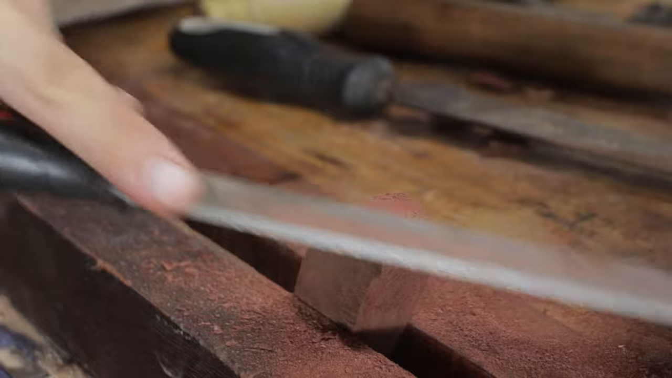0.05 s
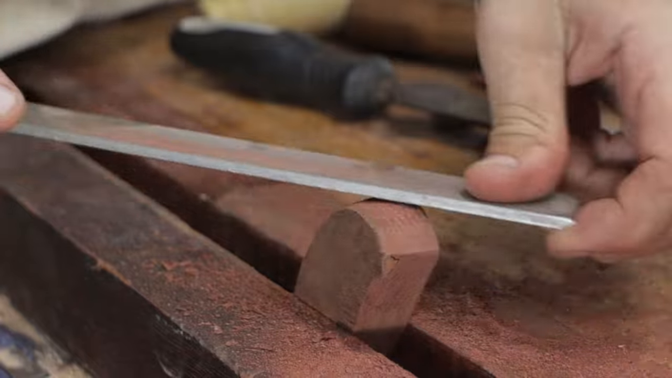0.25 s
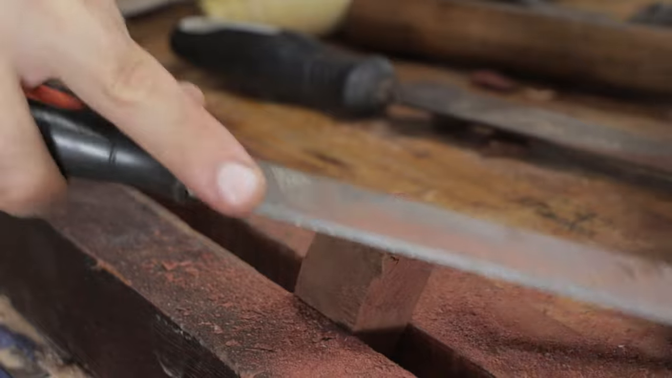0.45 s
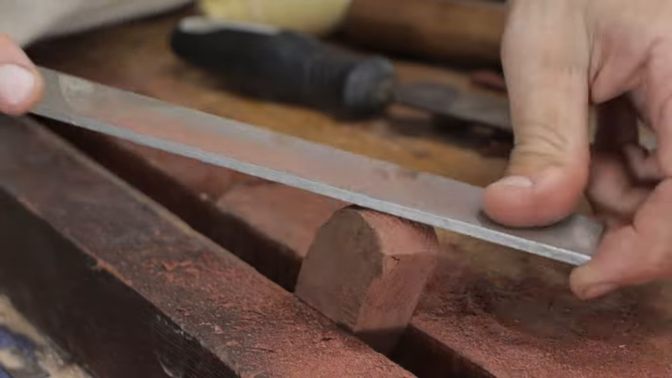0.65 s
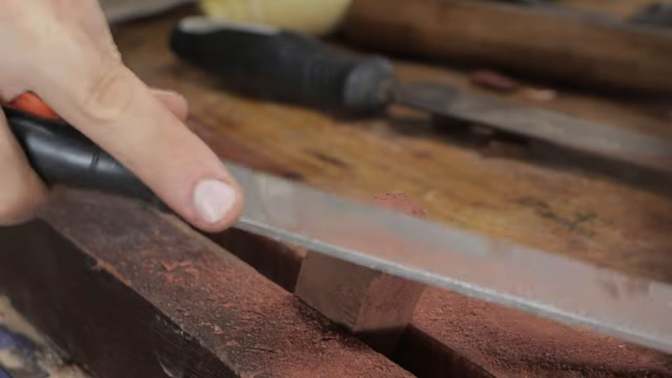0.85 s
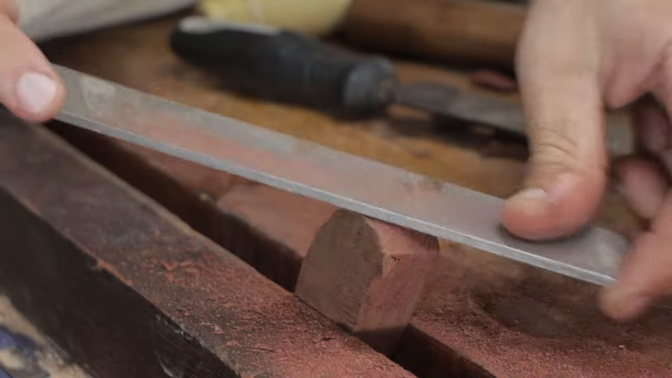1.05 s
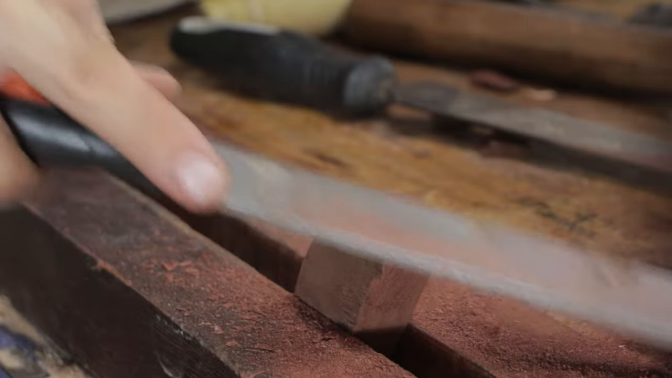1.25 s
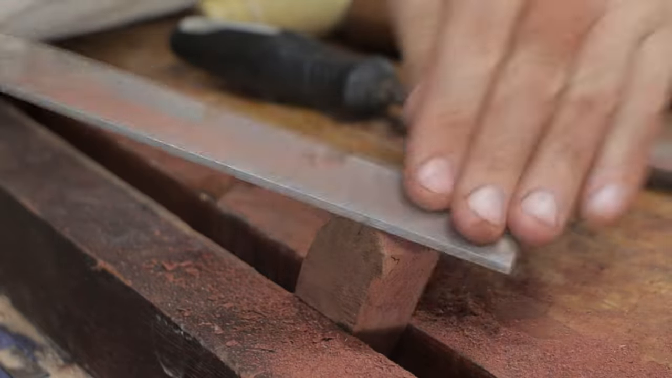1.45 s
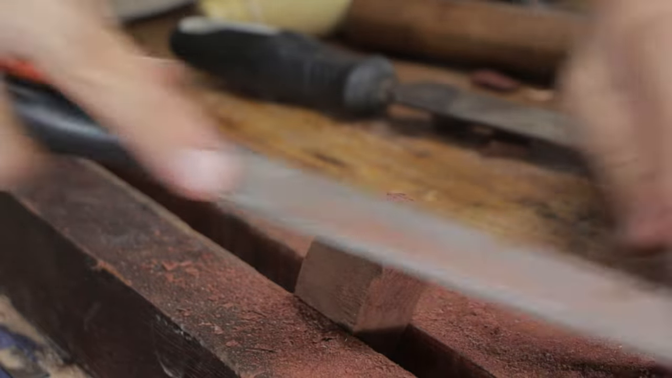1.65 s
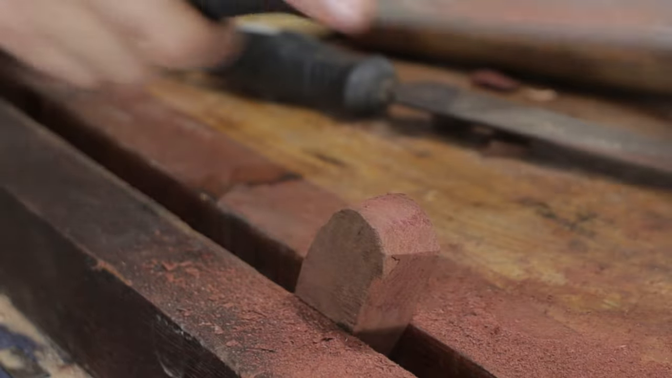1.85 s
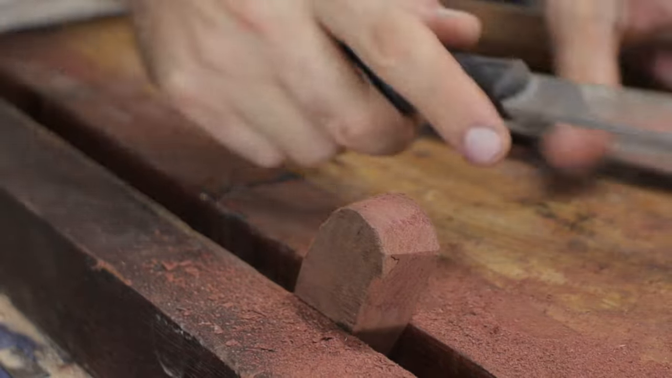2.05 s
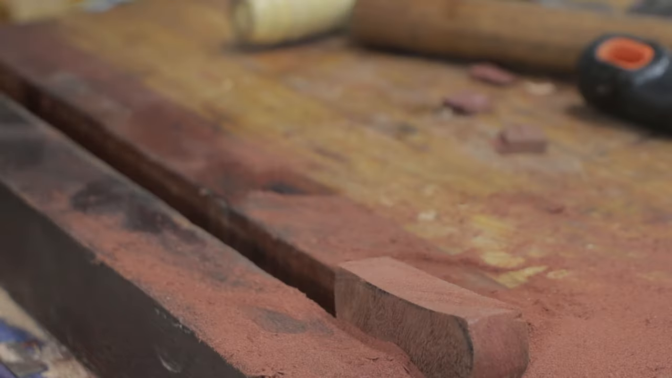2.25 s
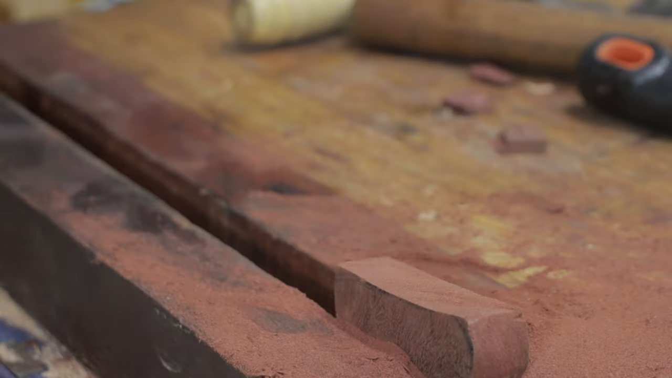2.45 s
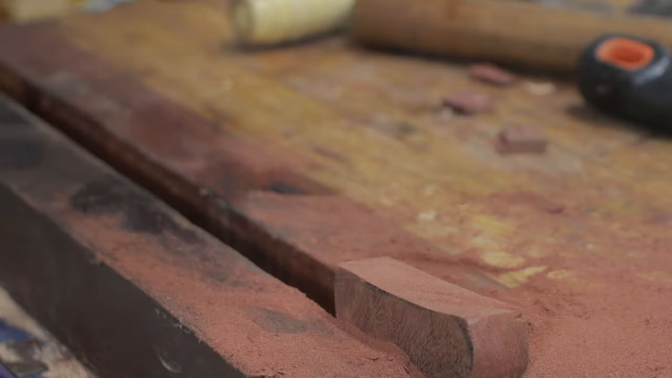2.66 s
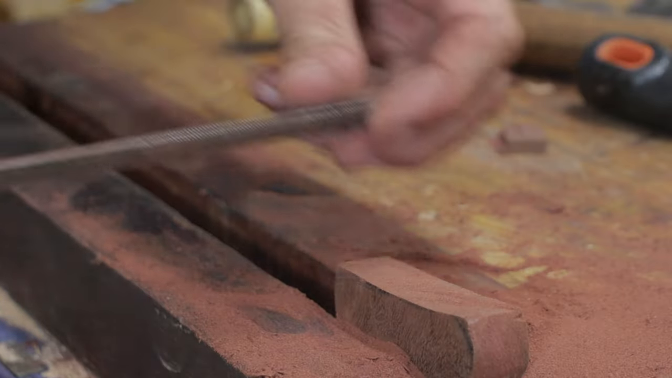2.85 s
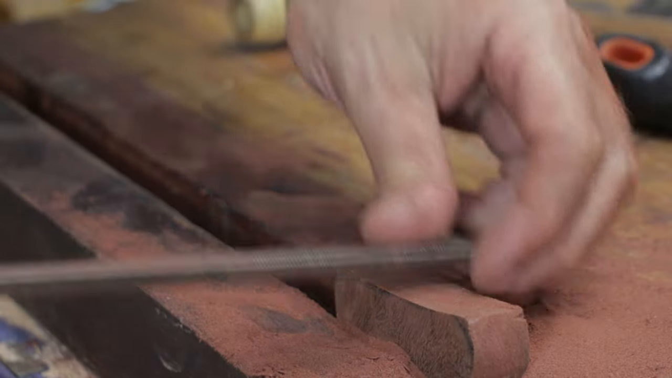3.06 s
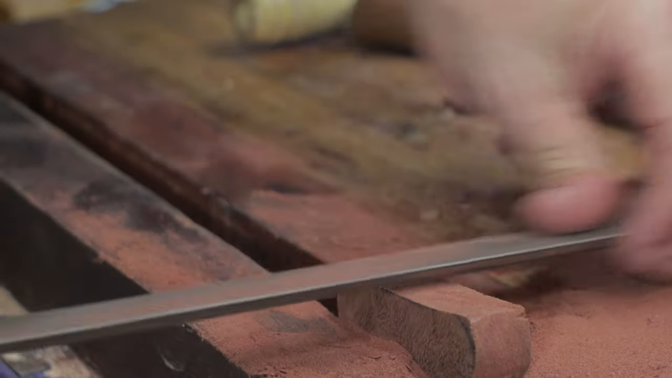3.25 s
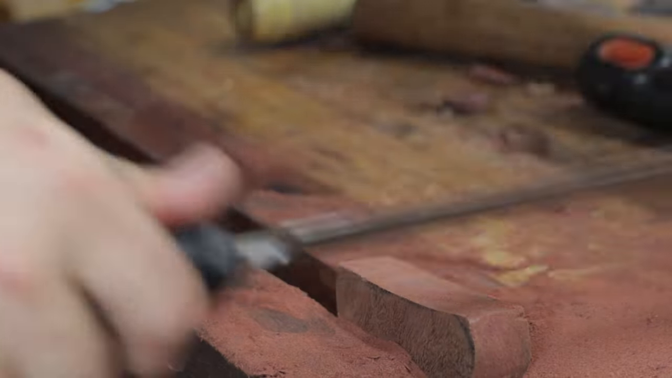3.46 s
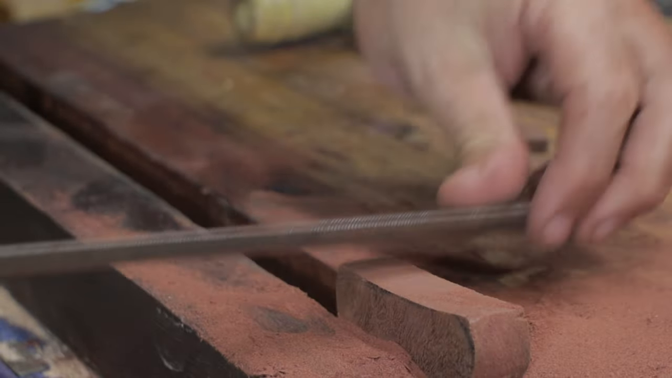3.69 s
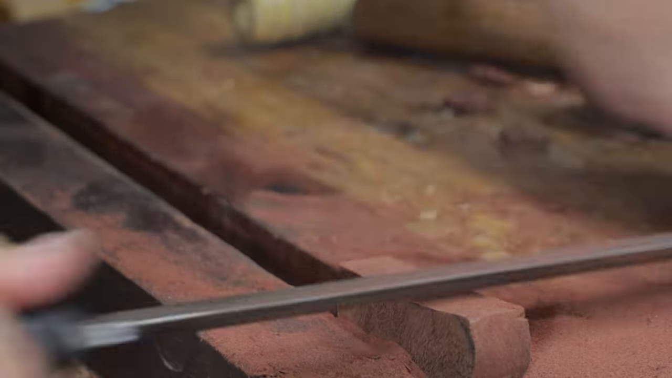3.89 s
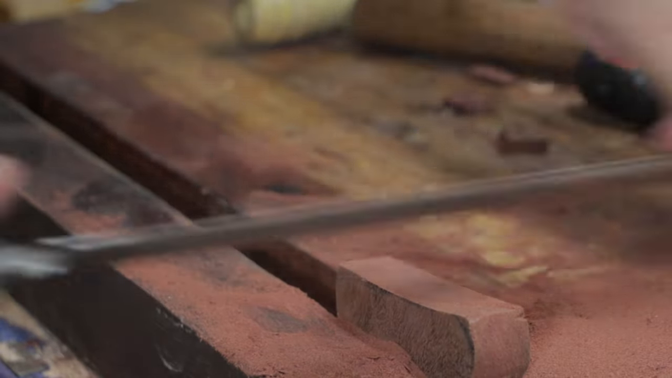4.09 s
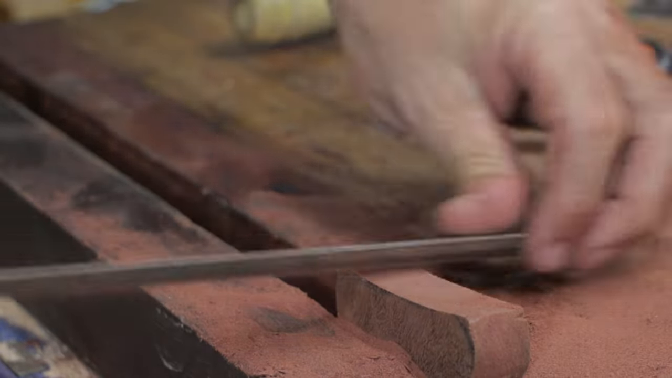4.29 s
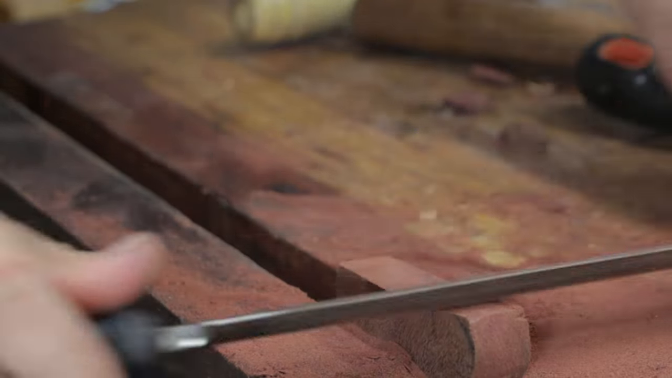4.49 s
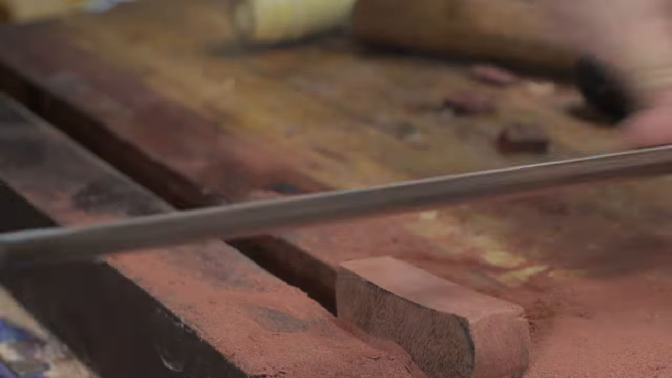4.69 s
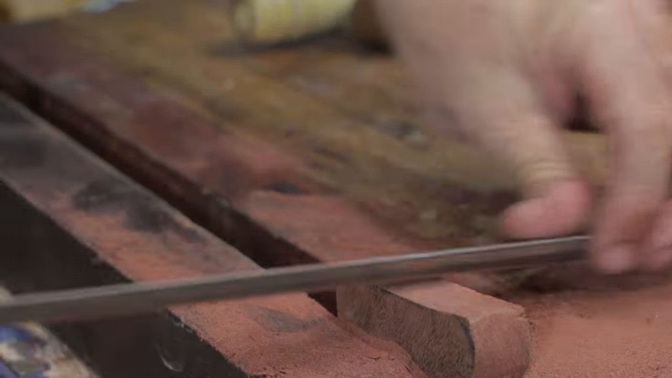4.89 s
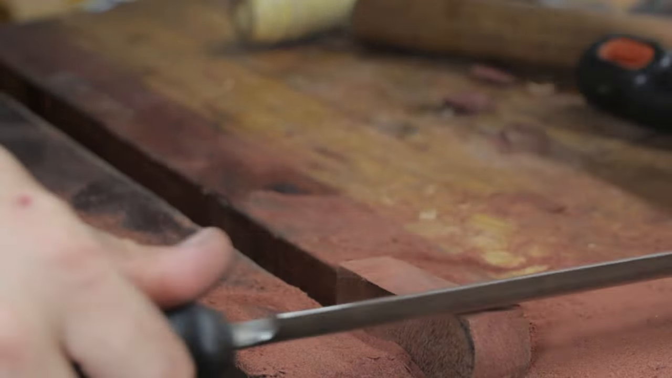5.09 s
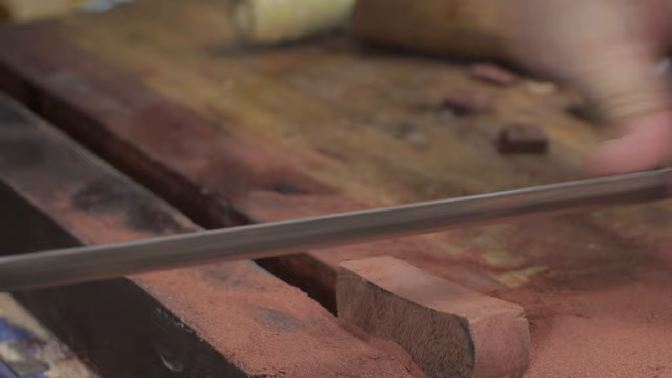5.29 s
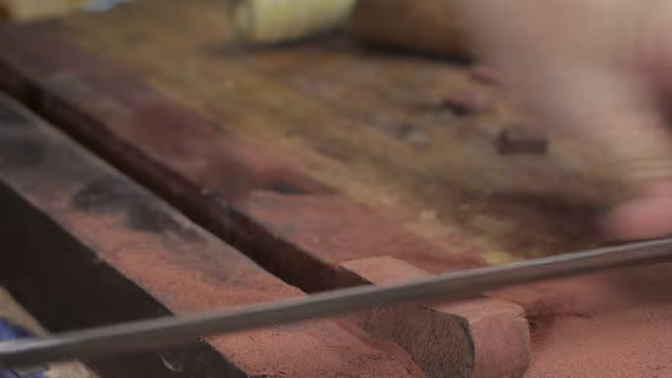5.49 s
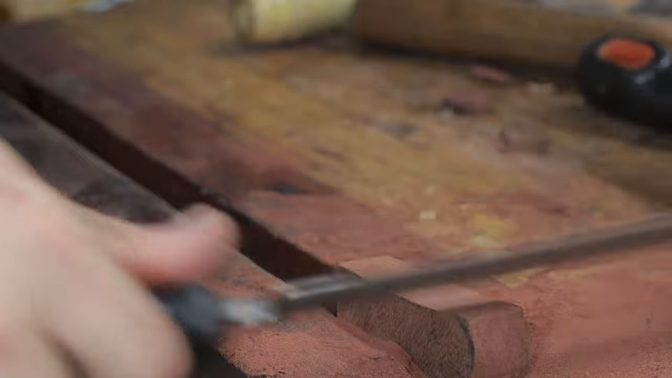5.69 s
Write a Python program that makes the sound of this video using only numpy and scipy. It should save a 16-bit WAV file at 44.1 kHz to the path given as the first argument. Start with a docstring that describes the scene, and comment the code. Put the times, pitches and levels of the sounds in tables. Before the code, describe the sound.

A steel file rasps a small wooden block in short, buzzing strokes, pauses for handling clicks, then resumes with coarser, ringing scrapes.

```python
"""Filing a wooden block at a bench

A steel hand file rasps a small wooden block held in a bench: first across its rounded end, then, after some
handling, along its flat side. Teeth and landing knocks drive the damped modes of bench, vice, block and blade;
torn fibres hiss as filtered noise, and short wavering tones glide. Touches tick and thud, hands and cloth rustle.
Outside, an engine of summed harmonics idles and pulls away; hum and far rumble are filtered noise.
"""
import sys
import numpy as np
from scipy import signal
from scipy.fft import rfft, irfft, next_fast_len
from scipy.io import wavfile
from scipy.ndimage import uniform_filter1d, map_coordinates

SR = 44100
rng = np.random.default_rng(int(sys.argv[2]) if len(sys.argv) > 2 else 0)


def dump(signal):
    """Clip the signal to [-1, 1] and save it as 16-bit WAV at the path in sys.argv[1]."""
    limited = np.clip(np.atleast_2d(signal).T, -1, 1)
    pcm = np.round(limited * 32767).astype(np.int16)
    wavfile.write(sys.argv[1], SR, pcm)


N = 252957

# The file lands or bounces on the wood; the first seven on the rounded end, the rest on the flat side:
# t/s, bench level/dB, then vice, block and blade level/dB relative to the bench
FILE_LANDINGS = [(0.324, -39, 2.5, -3, -16.5), (0.373, -51.5, -14, 6.5, -1), (0.705, -43, 1, 3, -9),
                 (0.724, -33, 2, 0, -18), (0.748, -44.5, -12, -2, -17), (1.128, -22.5, -2.5, -11.5, -25),
                 (1.576, -24, 6.5, -3.5, -27), (3.192, -32.5, 14, 4.5, -1.5), (3.28, -28.5, 4, -4.5, -23),
                 (3.845, -32.5, 7, -10, -2), (3.855, -22.5, 0.5, -36, -14), (4.396, -22.5, 1, -43, -19),
                 (4.966, -24, 0, -37, -24), (5.527, -26, 4, -31, -51)]


def amp(db):
    """Level law: the amplitude gain of a level in dB."""
    return 10 ** (np.asarray(db) / 20)


def unit(x):
    """Normalization: x scaled to rms 1."""
    return x / np.sqrt(np.mean(x ** 2) + 1e-20)


def along(points, hz):
    """Logarithmic interpolation: (f/Hz, value) points joined on a log-frequency axis."""
    f, v = np.transpose(points)
    return np.interp(np.log(hz + 1), np.log(f + 1), v)


def curves(rows, outside=-120):
    """Linear interpolation in time: each column after t/s sampled, with one fixed value outside the times."""
    s, *cols = np.transpose(rows)
    t = np.arange(N) / SR
    return np.array([np.interp(t, s, c, outside, outside) for c in cols])


def wobble(rate):
    """Band-limited randomness: a smooth curve through random knots, rate knots a second."""
    knots = rng.standard_normal(int(N * rate / SR) + 4)
    return map_coordinates(knots, [np.arange(N) * rate / SR])


def filtered(x, response):
    """Linear filtering: x times a complex response, scaled so that white noise keeps its level."""
    m = next_fast_len(N + SR // 2)
    gain = response(np.fft.rfftfreq(m, 1 / SR))
    gain = gain / np.sqrt(np.mean(abs(gain) ** 2))
    return irfft(rfft(x, m) * gain, m)[..., :N]


def resonances(modes):
    """Modal superposition: damped modes (f/Hz, width/Hz, level/dB) added with alternating sign."""
    def response(f):
        total = 0
        for k, (centre, width, db) in enumerate(modes):
            damping = 1j * f * width
            total = total + (-1) ** k * amp(db) * damping / (centre * centre - f * f + damping)
        return total
    return response


def patchy(depth_db, size=(3, 6)):
    """Spectro-temporal modulation: noise of rms 1 whose strength drifts in patches of pitch and time."""
    z = signal.stft(rng.standard_normal(N + SR), nperseg=512)[2]
    field = uniform_filter1d(rng.standard_normal(z.shape), size=size[0], axis=0)  # along pitch
    field = uniform_filter1d(field, size=size[1], axis=1)  # along time
    return unit(signal.istft(z * amp(depth_db * unit(field)), nperseg=512)[1][:N])


def end_filing():
    """Forced vibration of the upright block: the file crosses its rounded end."""
    # Pushes: touch-down t/s, build-up/s, hold/s, swell while held/(dB/s),
    # bench, vice, block and blade level/dB, teeth passing f/Hz
    end_pushes = [(-0.2, .13, 0.074, 5, -38.5, -39.5, -34.5, -42, 1362),
                  (0.324, 0.11, 0.081, 33, -41, -37.5, -33, -39.5, 1398),
                  (0.705, .14, 0.063, 42.5, -41, -36.5, -33, -37, 1427),
                  (1.128, 0.091, .06, 17.5, -38.5, -39, -31, -37, 1449),
                  (1.575, 0.1, 0.054, 38, -35.5, -34, -26.5, -32.5, 1533)]
    # How bench, vice, block and blade follow a push: rise/(dB/s), sag while held/(dB/s), fall/(dB/s),
    # lag/s, settling level after a landing/dB, its t60/s
    end_followers = [(100, 15, 260, 0.0081, -10, 0.19), (177, -4, 240, 0.0069, -12, 0.12),
                     (352, 2, 341, 0.00087, -6.5, 0.038), (330, 14, 331, 0.0017, 2.5, 0.035)]
    # What rings with the block upright: f/Hz, width/Hz, level/dB
    end_resonances = [(219, 17.5, 6), (284, 96, -7.5), (398, 108, -7.5), (592, 113, -8), (708, 157, -11),
                      (915, 190, -14), (1010, 18, -5.5), (1273, 108, -1), (1490, 111, 0), (1620, 79, 0),
                      (1940, 314, -8.5), (3460, 260, -18), (2800, 650, -28), (3840, 187, -8),
                      (4200, 740, -16), (5560, 220, -15), (6660, 290, -17.5), (8100, 530, -33.5)]
    return filing(end_pushes, end_followers, end_resonances, FILE_LANDINGS[:7], dust_db=-4,
                  slowing=.12, teeth_part=2, teeth_db=-17)  # the block buzzes


def side_filing():
    """Forced vibration of the block lying flat: a coarser cut excites it at a lower tooth rate."""
    # Pushes: touch-down t/s, build-up/s, hold/s, swell while held/(dB/s),
    # bench, vice, block and blade level/dB, teeth passing f/Hz
    side_pushes = [(3.192, 0.13, 0.1, 27, -42.5, -32, -33, -33.5, 420),
                   (3.848, 0.075, 0.13, -19, -37.5, -30.5, -33, -30.5, 649),
                   (4.398, 0.059, 0.14, 1, -41, -31, -35, -31.5, 641),
                   (4.967, 0.079, .12, -6.5, -39, -29, -34.5, -30.5, 668),
                   (5.526, 0.081, 0.11, -22, -39.5, -32, -34, -29.5, 670)]
    # How bench, vice, block and blade follow: rise/(dB/s), sag/(dB/s), fall/(dB/s), lag/s, settling level/dB, t60/s
    side_followers = [(49.4, 24, 67, -0.02, 1.5, 0.21), (30, 3.3, 246, 0.012, -9, 0.068),
                      (210, 5, 346, 0.0011, -19, 0.21), (270, 12.3, 320, -0.0021, -13.5, 0.3)]
    # What rings with the block lying flat: f/Hz, width/Hz, level/dB
    side_resonances = [(227, 30, -1.5), (268.5, 28.3, 0), (374.2, 33.6, 4), (550, 264, -6.5),
                       (605.4, 97, -1), (726, 85, -4), (807, 41, -5.5), (857, 77, -10.5), (1001.2, 23, -7),
                       (1263, 105, -8), (1728, 110, -9.5), (2030, 160, -18), (2120, 28, -3.5),
                       (2415, 430, -18.5), (2755, 118, -6), (3000, 150, -4), (3098, 106, 2),
                       (3700, 280, -6.5), (4090, 340, -4.5), (4500, 590, -11.5), (6130, 2600, -20.5),
                       (6740, 580, -12.5), (9030, 480, -29.5)]
    return filing(side_pushes, side_followers, side_resonances, FILE_LANDINGS[7:], dust_db=-9,
                  slowing=.5, teeth_part=1, teeth_db=-16)  # the vice buzzes


def sliding_back():
    """Friction noise without a tooth tone: the blade slides lightly back over its modes."""
    # Slides: touch-down t/s, build-up/s, hold/s, swell while held/(dB/s),
    # bench, vice, block and blade level/dB, teeth passing f/Hz (not sounded here)
    slide_pushes = [(3.505, 0.084, .26, -34, -52.5, -43.5, -46.5, -53, 915),
                    (4.13, 0.031, 0.34, -34, -52, -47, -63, -65, 912)]
    # How bench, vice, block and blade follow: rise/(dB/s), sag/(dB/s), fall/(dB/s), lag/s, settling level/dB, t60/s
    slide_followers = [(60, -21, 250, .001, 0, .1), (60, -17, 150, .001, 0, .1),
                       (200, 51, 300, .001, 0, .1), (29.6, -2, 300, 0.0014, 0, .1)]
    # What rings under the lightly held blade: f/Hz, width/Hz, level/dB
    slide_resonances = [(243, 34, -5), (372, 33, 9), (915, 140, -10.5), (1250, 83, -11.5), (1620, 160, -12),
                        (2110, 200, -11), (3180, 79, -10), (4760, 230, -33), (6560, 520, -16),
                        (8600, 340, -19.5), (10700, 1500, -34), (13000, 530, -28)]
    return filing(slide_pushes, slide_followers, slide_resonances, [], dust_db=-12.0)


def filing(strokes, parts, modes, landings, dust_db, slowing=0, teeth_part=None, teeth_db=0):
    """Source-filter principle: teeth catching fibres and landing knocks drive the modes of four parts."""
    # Edges of the bands that belong to bench, vice, block and blade: f/Hz
    band_edges = [0, 320, 1000, 2500, 20000]
    # Hiss of torn fibres: f/Hz, relative level per Hz/dB
    dust_spectrum = [(2350, 2), (4000, -13), (4780, 4.5), (6110, 1), (6730, -5.5), (8130, -8), (13600, -14),
                     (15700, -69)]
    effort, teeth_hz, pace = pushes(strokes, parts, landings, slowing)

    # the faster the push, the higher the buzz
    turn = 2 * np.pi * np.cumsum(abs(teeth_hz) * (1 + 0.04016 * wobble(70))) / SR
    uneven_db = 2.5 * wobble(40)
    buzz = pace * amp(teeth_db + uneven_db) * (np.sin(turn) + 0.33 * np.sin(2 * turn))
    chatter = unit(amp(0.33 * wobble(60) + 0.64 * wobble(500)))  # the teeth bite unevenly

    bounce = amp(-60 * np.arange(SR // 20) / SR / 0.0067)  # the blade rattles briefly as it settles
    blow = 6 * (np.arange(len(bounce)) == 0)  # the first contact is one firm push
    out = np.zeros(N)
    for part, (lo, hi) in enumerate(zip(band_edges, band_edges[1:])):
        # the contact travels along the blade, feeding now one mode, now another
        drive = chatter * patchy(depth_db=3, size=(7, 10))
        if part == teeth_part:
            drive = drive + buzz
        force = effort[part] * drive
        for s, db, *rel_db in landings:
            at = round(s * SR)
            knock = bounce * (blow + rng.standard_normal(len(bounce)))
            force[at:at + len(bounce)] += amp(db + [0, *rel_db][part] - 2.0) * knock
        part_modes = [mode for mode in modes if lo <= mode[0] < hi]
        out += filtered(force, resonances(part_modes))

    dust = filtered(patchy(depth_db=1.6), lambda hz: amp(along(dust_spectrum, hz)))
    return out + amp(dust_db) * effort[-1] * chatter * dust


def pushes(strokes, parts, landings, slowing):
    """Exponential envelopes: force builds after touch-down, holds and dies; each landing settles."""
    rounding_s = 0.041  # the hand eases from one phase into the next
    arc_s = .13  # the teeth pass fastest in mid-push and slowest this far from it
    t = np.arange(N) / SR
    effort, teeth_hz, pace = np.zeros((len(parts), N)), np.zeros(N), np.zeros(N)
    for s, build_s, hold_s, swell, *levels_db, hz in strokes:
        for k, (rise, sag, fall, lag_s, *_) in enumerate(parts):
            u = t - s - build_s - lag_s  # time since the hold began
            shape_db = rise * np.minimum(u, 0)
            shape_db += (swell - sag) * np.clip(u, 0, hold_s)
            shape_db -= fall * np.maximum(u - hold_s, 0)
            shape = amp(uniform_filter1d(shape_db, size=int(rounding_s * SR)))
            effort[k] += (t >= s) * amp(levels_db[k]) * shape
        from_middle = (t - s - build_s - hold_s / 2) / arc_s
        speed = np.cos(np.pi / 2 * np.clip(from_middle, -1, 1))
        pace = np.where(t >= s, speed, pace)
        teeth_hz = np.where(t >= s, hz * (1 - slowing * (1 - speed)), teeth_hz)
    for s, db, *rel_db in landings:
        for k, (*_, settle_db, t60) in enumerate(parts):
            effort[k] += (t >= s) * amp(db + [0, *rel_db][k] + settle_db - 60 * abs(t - s) / t60)
    return effort, teeth_hz, pace


def singing():
    """Frequency modulation: a wavering tone swells, glides and dies: bench ring, blade whistle, tooth buzz or bounce."""
    # Tones: loudest t/s, f/Hz, glide/(Hz/s), waver as a share of f, level/dB, rise/(dB/s), fall/(dB/s)
    sung_tones = [(0.545, 1293, -300, 0.021, -38, 304, 300), (0.547, 219, -19, 0.0085, -31.5, 900, 202),
                  (0.707, 1291, -100, .02, -36, 6000, 450), (0.724, 1291, -100, .02, -36, 5000, 700),
                  (0.746, 1291, -100, .02, -39, 5000, 700), (1.141, 219, -20, .01, -36.5, 2000, 400),
                  (1.32, 219, -20, 0.0093, -40.5, 90, 248), (1.7, 219, -19.5, .01, -31, 300, 300),
                  (3.405, 713, 1399.5, .015, -29, 332, 258), (3.553, 915, 100, 0.054, -36.5, 3000, 107),
                  (4.635, 369, -50, 0.016, -28.5, 402, 400), (5.21, 391.3, -50.5, 0.016, -30, 400, 400)]
    out, t = np.zeros(N), np.arange(N) / SR
    for s, hz, glide, waver, db, rise, fall in sung_tones:
        gliding_hz = hz + glide * np.clip(t - s, -.1, .1)
        turn = 2 * np.pi * np.cumsum(gliding_hz * (1 + waver * wobble(220))) / SR
        swell_db = np.where(t < s, rise, -fall) * (t - s)
        flutter_db = 3 * wobble(110)
        out += np.sqrt(2) * amp(db + swell_db + flutter_db) * np.sin(turn)
    return out


def touches():
    """Impact excitation: tools and hands tick around a pitch of their own and thud in the bench."""
    # Touches: t/s, tick peak level/dB, tick f/Hz, thud level relative to the tick/dB
    touch_events = [(1.9362, -42.5, 1520, -10), (1.9628, -47, 2200, -19), (2.029, -45, 1620, 2),
                    (2.036, -40, 8600, -23), (2.0405, -36, 9900, -31), (2.06, -42, 4760, -11),
                    (2.0768, -39, 1640, 1.5), (2.0825, -26.5, 4030, -20), (2.095, -37, 1780, 0.5),
                    (2.1276, -42, 1760, -5), (2.2082, -40, 1940, 3), (2.2119, -37, 3570, 5),
                    (2.4826, -36.5, 4020, -10), (2.491, -32, 1510, 1.5), (2.8135, -55, 1620, 20.5),
                    (2.8653, -46, 2300, -24), (2.9948, -34, 7700, -24), (3.019, -58, 1590, 11),
                    (3.0664, -37.5, 3500, -30)]
    ticks, blows, t = np.zeros(N), np.zeros(N), np.arange(SR // 20) / SR
    for s, db, hz, thud_db in touch_events:
        at = round(s * SR)
        crack = amp(-60 * t / 0.0072) * rng.standard_normal(len(t))
        # two decays: one lasts three periods, the other a fixed 6.2 ms
        body = np.sin(2 * np.pi * hz * t) * (amp(-60 * t * hz / 3) + 0.27 * amp(-60 * t / 0.0062))
        tick = np.convolve(crack, body)[:len(t)]
        ticks[at:at + len(t)] += amp(db) * tick / abs(tick).max()
        blows[at:at + len(t)] += amp(db + thud_db + 7.5) * amp(-60 * t / 0.00071)  # one firm push
    bench = resonances([(258, 300, 10.1), (420, 210, 12.3), (596, 89, 9.5), (933, 140, 0.5)])
    return ticks + filtered(blows, bench)


def handling():
    """Filtered friction noise: grainy rustle of skin and cloth on wood."""
    # Hands and cloth brush about: t/s, low rustle level/dB, high rustle level/dB
    rustle_levels = [(1.8, -53, -64), (1.87, -84, -63), (2.06, -56, -72.5), (2.14, -51.5, -55),
                     (2.26, -52, -64), (2.5, -50.5, -57), (2.62, -52, -61), (2.735, -61, -64),
                     (2.745, -47, -47.5), (2.79, -61, -53.5), (2.84, -83, -69.5), (3.04, -68, -72),
                     (3.19, -59, -79)]
    low_db, high_db = curves(rustle_levels)
    wood = resonances([(277, 85, -0.5), (440, 155, -1), (696, 220, -3), (980, 160, -5.0)])
    low = filtered(patchy(depth_db=5.0), lambda hz: wood(hz) / (1 + (hz / 1500) ** 2))
    # cloth spectrum: f/Hz, relative level/dB
    cloth = [(800, -26.0), (1500, 1.0), (2100, -2.5), (2700, -16.0), (3300, -7.0), (6000, -13.0),
             (12000, -19), (13200, -46)]
    high = filtered(patchy(depth_db=1.5), lambda hz: amp(along(cloth, hz)))
    grain = unit(amp(2.3 * wobble(200)))
    return amp(low_db) * low + amp(high_db) * grain * high


def engine():
    """Harmonic series: slightly unsteady low multiples of the engine's firing rate."""
    # The engine outside: t/s, firing rate f/Hz, level/dB
    engine_course = [(2.2, 40.6, -52), (2.25, 42.2, -34.5), (2.4, 43.25, -33.5), (3.25, 42.1, -33.5),
                     (3.4, 47, -30.5), (3.61, 54.3, -30.5), (3.82, 56.5, -26.5), (3.91, 57.7, -32),
                     (3.99, 60.4, -64), (4.13, 61.8, -28.5), (4.25, 66.3, -45), (4.3, 66.9, -40),
                     (4.43, 69.6, -46), (4.69, 73, -40), (5.02, 78.7, -52), (5.36, 79.4, -45),
                     (5.74, 80, -59)]
    # Multiples 1-4 of the firing rate: relative level/dB
    order_levels = [-2.5, -23.5, -26.5, -41.5]
    hz, db = curves(engine_course)
    turn = 2 * np.pi * np.cumsum(abs(hz)) / SR
    tones = np.zeros(N)
    for k, level in enumerate(order_levels, 1):
        tones += amp(level + 1.2 * wobble(18)) * np.sin(k * turn + k)
    return np.sqrt(2) * amp(db) * tones


def workshop():
    """Spectral shaping of noise: steady hum of the room and a wandering rumble from the street."""
    # Workshop hum: f/Hz, relative level per Hz/dB
    hum_spectrum = [(15, -52), (25, -11), (74, -4.5), (104, -10.5), (151, -16), (256, -9), (508, -10),
                    (735, -28), (817, -16.5), (1060, -26.5), (1150, -26.5), (2610, -39), (3230, -36),
                    (10100, -38.5), (13800, -52)]
    # Far traffic: t/s, level/dB
    rumble_levels = [(0.0, -58), (0.8, -54.5), (1.4, -71), (2.1, -55.5), (3.4, -59.5), (3.8, -40.5),
                     (4.64, -48.5), (5.2, -60), (5.74, -50.5)]
    hum = filtered(patchy(depth_db=1.4), lambda hz: amp(along(hum_spectrum, hz)))
    walls = resonances([(52.7, 10.5, -0.28), (114.8, 26, -0.72)])  # the walls let two low bands through
    street = unit(filtered(rng.standard_normal(N), lambda hz: walls(hz) ** 2))
    road = resonances([(242, 150, -4.0), (417, 250, -1)])  # tyres and exhausts
    drone = unit(filtered(patchy(depth_db=3), lambda hz: road(hz) ** 2))
    rumble = amp(curves(rumble_levels)[0]) * (street + amp(-3.5) * drone)
    return amp(-55) * unit(hum) + rumble


def echo(x):
    """Frequency-dependent reverberation: each frequency of the walls' answer dies at its own speed."""
    # Decay of the walls' answer: f/Hz, t60/s
    wall_decay = [(200, 0.24), (2000, 0.19), (10000, 0.034)]
    hz, t, z = signal.stft(rng.standard_normal(SR // 2), SR, nperseg=256)
    decay = amp(-60 * t / along(wall_decay, hz)[:, None])
    tail = signal.istft(z * decay, SR, nperseg=256)[1]
    return signal.fftconvolve(x, tail / np.linalg.norm(tail))[:N]


def scene():
    """Superposition: all sources add at one microphone, copied to both channels."""
    near = end_filing() + side_filing() + sliding_back() + singing() + touches()
    mono = near + amp(-11.5) * echo(near) + handling() + engine() + workshop()
    return np.tile(mono, (2, 1))


def record(dry):
    """Band limiting: the microphone loses the deepest bass, the recorder all above its limit."""
    top_hz = 15800
    m = next_fast_len(N + SR // 2)
    hz = np.fft.rfftfreq(m, 1 / SR)
    bass = (hz / (hz - 30j)) ** 2  # two high-passes at 30 Hz
    return irfft(rfft(dry, m) * bass * (hz < top_hz), m)[:, :N]


dry = scene()
out = record(dry)
dump(out)
```